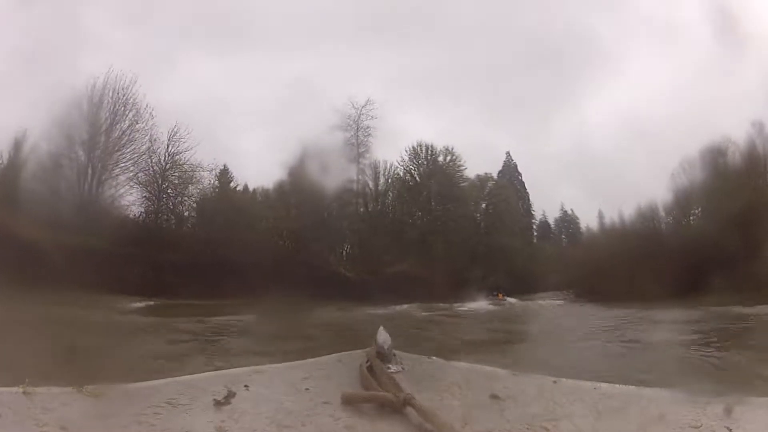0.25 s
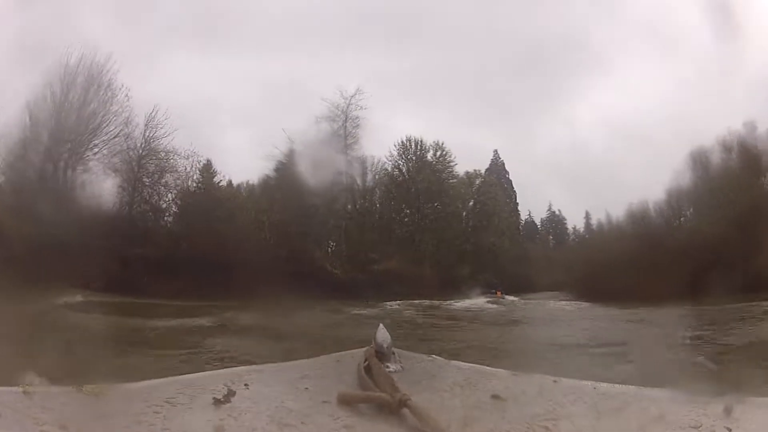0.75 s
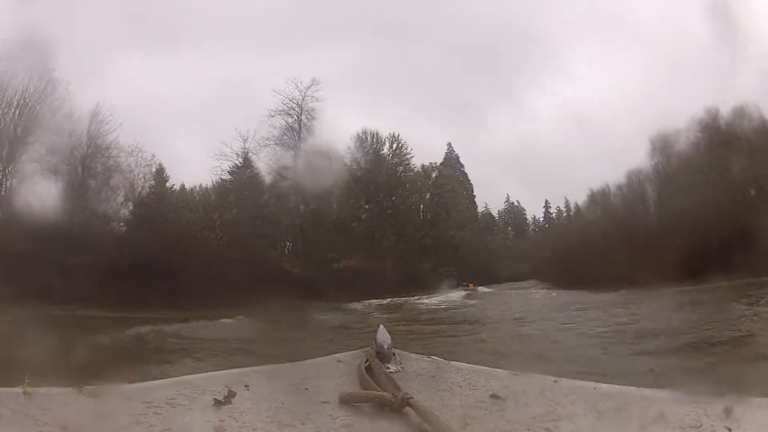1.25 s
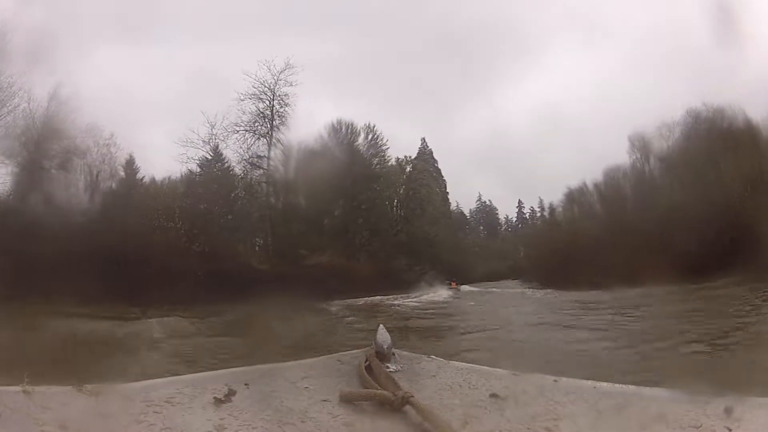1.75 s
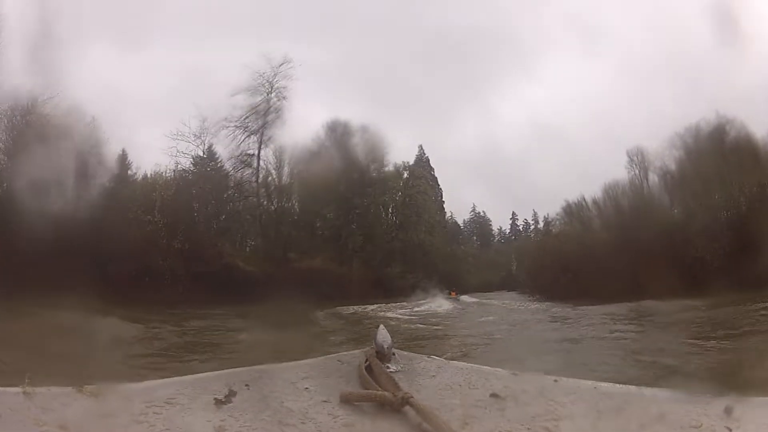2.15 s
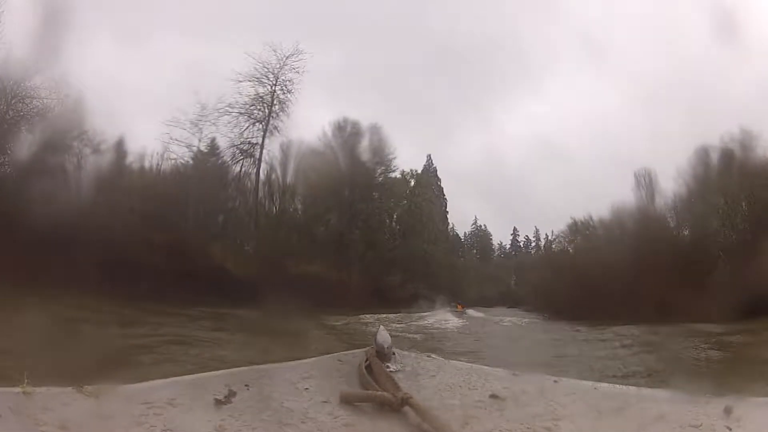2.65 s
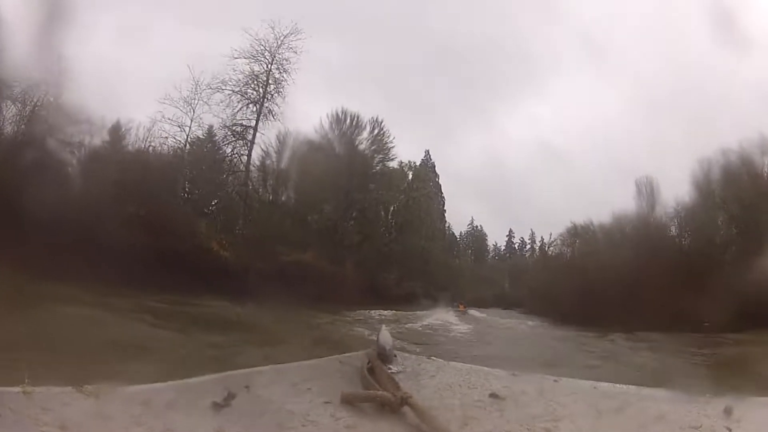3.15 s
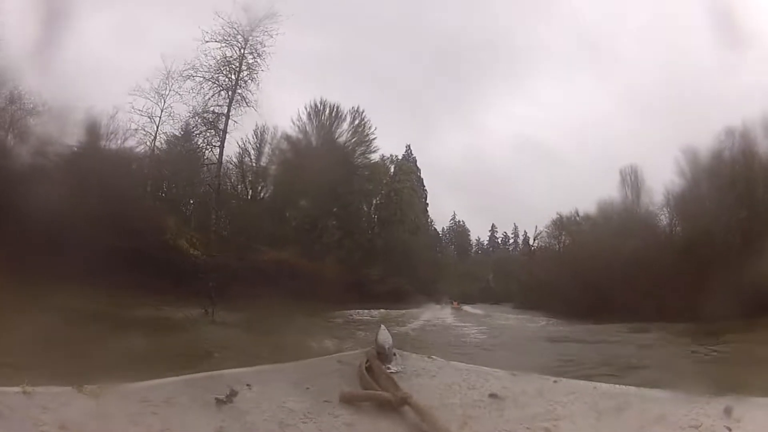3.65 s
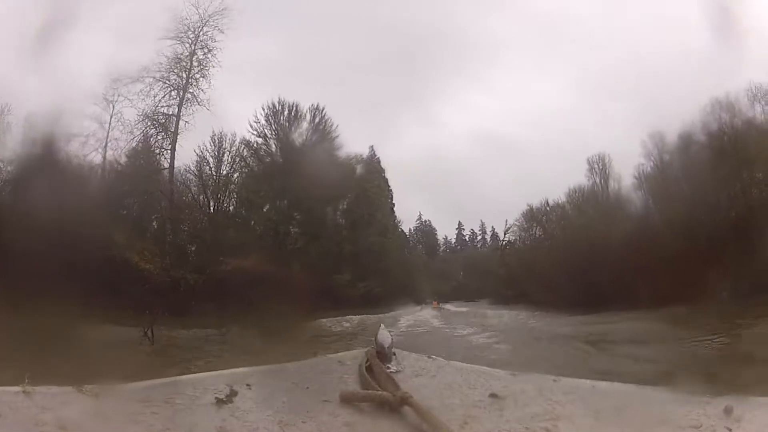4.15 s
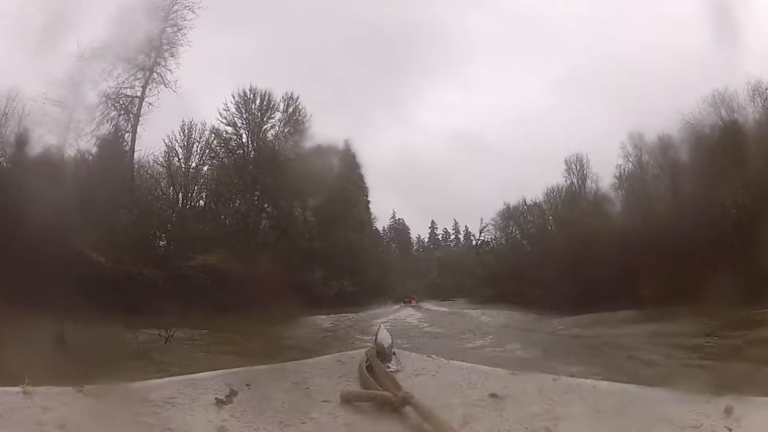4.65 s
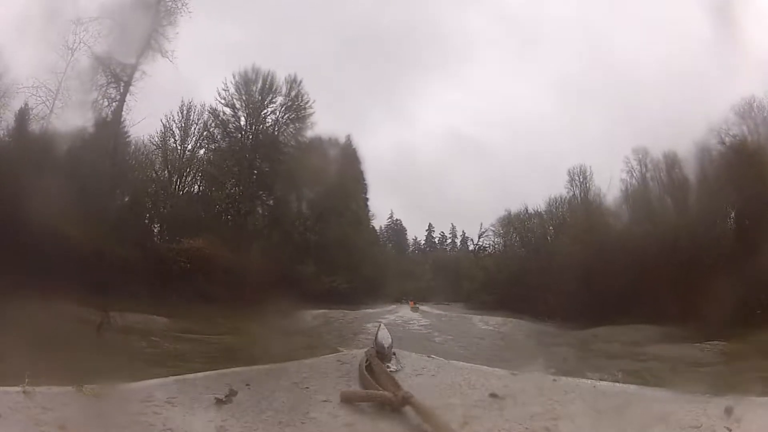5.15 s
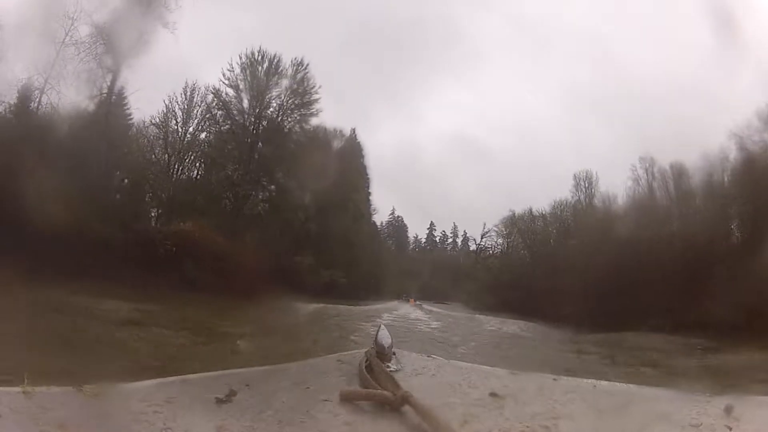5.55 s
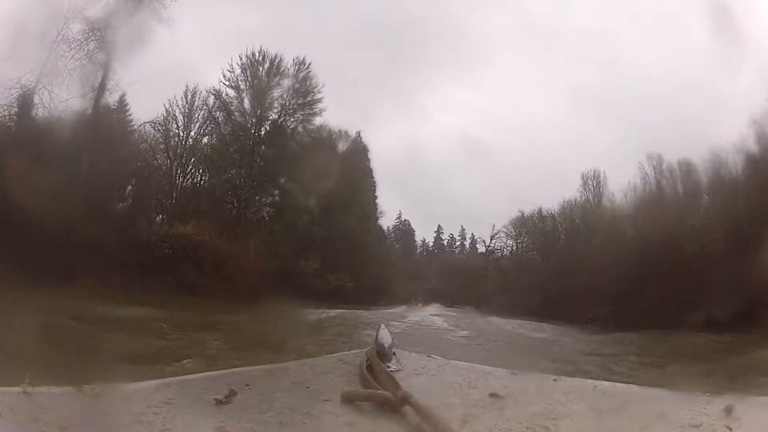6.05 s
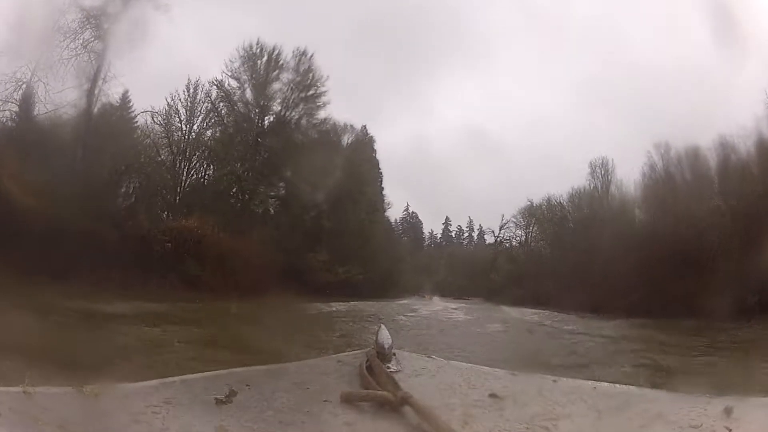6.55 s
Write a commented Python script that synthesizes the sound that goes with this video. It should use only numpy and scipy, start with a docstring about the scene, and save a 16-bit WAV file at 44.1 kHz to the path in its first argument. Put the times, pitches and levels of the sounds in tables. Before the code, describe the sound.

Steady resonant water hiss surrounds a motorboat engine heard close through the hull. The pitch climbs briefly, collapses, then recovers to a long droning cruise full of little clicks. Near the end the throttle is cut and the hull rumbles and booms with quick wave thumps as the engine chugs low and slowly picks up. Outdoors on a river, the microphone is enclosed, so the sound is hollow, coloured and identical on both sides.

```python
"""On a river, inside a closed case on the bow of a small jet boat that is under way.
The engine cruises, races, drops to a chug and picks up again, then drops once more and slowly picks up.
Sine orders make its drone and pulses its buzz; filtered noise and pulses make the hull rumble, boom and sing.
Filtered noise rushes as water and rings the case; short clicks crackle where drone or boom is loud.
Narrow resonances colour all but the drone, and held samples mirror the sound into a glassy treble."""
import sys
import numpy as np
from scipy import signal
from scipy.fft import rfft, irfft
from scipy.io import wavfile
from scipy.ndimage import uniform_filter1d

SR = 44100
rng = np.random.default_rng(int(sys.argv[2]) if len(sys.argv) > 2 else 0)


def unload_audio(sound):
    """Save the sound as a 16-bit wav file, at the path given as the first command line argument."""
    columns = np.transpose(np.atleast_2d(sound))
    # keep every value between -1 and 1, then stretch to whole-number steps
    steps = np.round(np.clip(columns, -1, 1) * 32767)
    wavfile.write(sys.argv[1], SR, steps.astype(np.int16))


N = 299439
TIME, FREQ = np.arange(N) / SR, np.fft.rfftfreq(N, 1 / SR)  # s, Hz


def amp(db):
    """Decibels to gain."""
    return 10 ** (np.asarray(db) / 20)


def unit(x):
    """Scales to rms 1."""
    return x / np.sqrt(np.mean(x ** 2) + 1e-20)


def drift(rate_hz):
    """Slow random movement of rms 1, up to about this rate."""
    spectrum = rfft(rng.standard_normal(N))
    return unit(irfft(spectrum / (1 + (FREQ / rate_hz) ** 4), N))


def churn(patchy_db, rate_hz):
    """Noise that comes in uneven gusts."""
    return rng.standard_normal(N) * amp(patchy_db * drift(rate_hz))


def steadied(x, size):
    """Holds the rms at 1 over spans of this many samples, leaving the quicker throb."""
    return x / np.sqrt(uniform_filter1d(x ** 2, size=size) + 1e-12)


def scatter(x, spread_s=.014):
    """Each pitch takes its own path through the hull, so sharp pulses arrive smeared."""
    knots = np.arange(0, SR / 2, 45)
    delay_s = np.interp(FREQ, knots, spread_s * rng.random(len(knots)))
    phase = 2 * np.pi * np.cumsum(delay_s) * SR / N
    return irfft(rfft(x) * np.exp(-1j * phase), N)


# narrow resonances of the case: (f/Hz, width/Hz, lift/dB)
MODES = [(331.3, 15.4, 7.5), (608.5, 29, 10), (759, 13, 4), (998, 22, 6), (1094, 14.5, 6.5), (1777, 94, 3),
         (1891, 140, 5), (1938, 20, 3), (2039, 40, 9.5)]


def colour(x, points):
    """Filters by a relative spectrum and by the narrow resonances of the case; rms 1."""
    hz, db = np.transpose(points)
    shape_db = np.interp(np.log(FREQ + 1), np.log(hz), db, left=-90, right=-90)
    lift_db = sum(lift / (1 + (2 * (FREQ - f) / width) ** 2) for f, width, lift in MODES)
    return unit(irfft(rfft(x) * amp(shape_db + lift_db), N))


CRUISE_HZ = 64  # firing rate at cruise


def by_revs(law, rate_hz):
    """A level in dB that changes steadily with each octave the engine turns below or above cruise."""
    cruise_db, db_per_octave = law
    return cruise_db + db_per_octave * np.log2(CRUISE_HZ / rate_hz)


# engine speed: (t/s, firing rate f/Hz)
REVS = [(0, 51.46), (.36, 60.94), (.72, 65.26), (.87, 63.23), (1.29, 64.57), (1.46, 70.56), (1.65, 86.6),
        (1.77, 85), (1.83, 54.07), (1.98, 36.3), (2.1, 37.5), (2.3, 56.04), (2.48, 60.49), (2.7, 66.73),
        (3.05, 68.68), (3.6, 65.78), (4.23, 67.2), (4.42, 64.7), (4.66, 61.99), (4.9, 61.91), (5.05, 62.68),
        (5.28, 62.37), (5.36, 47.07), (5.48, 35.22), (5.61, 28.17), (5.88, 27.56), (6.12, 29.59),
        (6.33, 32.91), (6.79, 38.88)]


def revs():
    """The firing rate, and the running count of firings with a slight waver in speed."""
    rate_hz = np.interp(TIME, *np.transpose(REVS))
    turns = np.cumsum(rate_hz * (1 + .002 * drift(12))) / SR
    return rate_hz, turns


# the throttle is let go and the jet falls quiet: (start t/s, recovery t/s, depth level/dB)
THROTTLE_CUTS = [(1.668, 1.987, 6.5), (5.227, 5.508, 3)]
CUT_FALL_S, CUT_RECOVER_S = 0.086, 0.049


def throttle_drop():
    """Decibels lost while the throttle is let go: a fall, a hold and a quick recovery."""
    drop_db = 0
    for start, end, depth_db in THROTTLE_CUTS:
        fall = (TIME - start) / CUT_FALL_S
        recovery = 1 - (TIME - end) / CUT_RECOVER_S
        drop_db = drop_db + depth_db * np.clip(np.minimum(fall, recovery), 0, 1)
    return drop_db


# how well the hull passes an engine order, with resonances near 205 and 240 Hz: (f/Hz, level/dB before order trim)
DRONE = [(28, -20.5), (29, -30), (52, -39), (63, -32), (65, -37), (66.5, -47), (85, -42), (98, -34),
         (118, -48), (130, -46), (135, -31.5), (150, -51), (180, -31), (194, -26), (199, -16), (205, -11.5),
         (214, -15), (223, -28), (240, -9.5), (262, -39.5)]
# trim of orders one to three, the second weakest: (level/dB)
ORDERS_DB = [-1, -7.5, -0.5]
RING_UP_S = 0.052
DRONE_WAVER_DB, DRONE_WAVER_HZ = .9, 12  # rms depth, top rate


def drone_levels(rate_hz, drop_db):
    """Level in dB of the first three orders: the hull takes a moment to ring up on each, and they waver."""
    keep = np.exp(-1 / (RING_UP_S * SR))
    levels = []
    for k, order_db in enumerate(ORDERS_DB, 1):
        db = order_db + np.interp(k * rate_hz, *np.transpose(DRONE))
        rung_up = db[0] + signal.lfilter([1 - keep], [1, -keep], db - db[0])
        # slow to rise, quick to fall
        levels.append(np.minimum(db, rung_up) + DRONE_WAVER_DB * drift(DRONE_WAVER_HZ))
    levels[-1] -= drop_db  # the third order sags with the throttle
    return levels


# strength of each firing in the cycle of three, at contrast 1: (level/dB)
CYLINDERS_DB = [0, -4.5, -2.5]


def firings(turns, uneven, contrast=1):
    """One pulse a firing; the cylinders differ in strength and timing, and each pulse varies at random."""
    count = len(CYLINDERS_DB)
    timed = turns + .007 * np.sin(2 * np.pi * turns / count)
    fired = np.floor(timed).astype(int)
    strength = amp(CYLINDERS_DB)[fired % count] ** contrast
    strength = strength * (1 + uneven * rng.standard_normal(N))
    return np.diff(fired, prepend=0) * strength


# spectrum of the exhaust buzz: (f/Hz, relative level/dB)
EXHAUST = [(230, -39), (270, -7.5), (330, -1), (400, -10), (455, -0.5), (510, 8.5), (620, 0.5), (750, 3),
           (1030, 5), (1400, -14), (1820, 16), (2100, 4.5), (2400, 1), (3000, -46)]
# the buzz hardly follows the revs: (cruise level/dB before trim, rise/dB per octave of lost revs)
BUZZ_LAW = (-34.5, -0.26)
# the exhaust's path shifts as the boat moves: rms swing in radians, top rate
PATH_SWING, PATH_HZ = .7, 4


def engine(turns, rate_hz, orders_db, drop_db):
    """Clean low orders under the firing buzz, whose partials fade in and out as their path shifts."""
    drone = 0
    for k, db in enumerate(orders_db, 1):
        drone = drone + amp(db) * np.sqrt(2) * np.sin(2 * np.pi * k * turns)
    pulses = firings(turns, uneven=.1)
    angle = PATH_SWING * drift(PATH_HZ)
    heard = np.cos(angle) * scatter(pulses) + np.sin(angle) * scatter(pulses)
    buzz_db = by_revs(BUZZ_LAW, rate_hz) - drop_db
    return drone + colour(heard, EXHAUST) * amp(buzz_db + 10.5)


# the slower the engine, the harder it rocks the hull:
# (cruise level/dB before trims, rise/dB per octave of lost revs)
RUMBLE_LAW = (-38.5, 13.7)
BOOM_LAW = (-29, 10.2)
PANEL_LAW = (-37.5, 11.9)
# the boom gives way to a strong drone: (third-order level/dB, change of the boom level/dB)
BOOM_YIELD = [(-34.5, 0.5), (-9, -8.5)]
RUMBLE_CUT_SHARE, BOOM_CUT_SHARE = 0.76, .3  # how much of a throttle cut reaches each


def hull_levels(rate_hz, third_db, drop_db, rumble_change_db, boom_change_db):
    """Levels in dB of rumble, boom and panel, set by the revs, the throttle and the passing changes."""
    rumble_db = by_revs(RUMBLE_LAW, rate_hz) + rumble_change_db - RUMBLE_CUT_SHARE * drop_db
    yield_db = np.interp(third_db, *np.transpose(BOOM_YIELD))
    boom_db = by_revs(BOOM_LAW, rate_hz) + boom_change_db + yield_db - BOOM_CUT_SHARE * drop_db
    panel_db = by_revs(PANEL_LAW, rate_hz) - drop_db
    return rumble_db, boom_db, panel_db


# spectra of the hull's rumble, boom and singing panel: (f/Hz, relative level/dB)
RUMBLE = [(12, -34), (25, -10), (45, -14), (72, -9), (100, -5.5), (125, -7.5), (150, -4.5), (170, -0.5),
          (260, 2), (340, -18.5), (600, -14.5)]
BOOM = [(150, -44), (185, -22), (212, 14.5), (245, 11), (268, -3.5), (288, -45), (310, -86), (330, -13.5),
        (355, -27), (450, -23)]
PANEL = [(640, -24), (690, -4), (708, 2), (735, -5), (800, -24)]
SEVENTH_SHARE = .13  # the seventh order's amplitude in the shaking


def hull(turns, rumble_db, boom_db, panel_db):
    """Engine and water shake the hull, which rumbles, booms in one narrow band and sings in one panel."""
    rocking = firings(turns, uneven=.2, contrast=3.5)
    shake = .45 * unit(churn(patchy_db=1.5, rate_hz=15)) + unit(rocking)
    # at low revs the seventh order sweeps up through the boom
    seventh = SEVENTH_SHARE * np.cos(2 * np.pi * 7 * turns)
    boom = colour(shake + seventh, BOOM)
    blows = thumps(swell_s=.014) * steadied(boom, size=800)
    # around each wave its blow takes over from the steady throb
    calm = 1 / (1 + (thumps(swell_s=.028) / amp(boom_db)) ** 2)
    throb = calm * amp(boom_db) * steadied(boom, size=4000)
    rumble = amp(rumble_db + 2.0) * colour(churn(patchy_db=-1, rate_hz=17), RUMBLE)
    panel = amp(panel_db - 6) * colour(scatter(shake), PANEL)
    return throb + blows + rumble + panel


# waves that thump the hull: (t/s, level/dB before trim)
THUMPS = [(1.935, -12.5), (2.109, -17), (5.402, -9), (5.566, -6.5), (5.725, -7.5), (5.776, -2), (5.864, -9),
          (6.075, -2.5), (6.115, 0), (6.191, -6), (6.228, -8.5), (6.277, -7.5), (6.321, -5), (6.403, -5.5),
          (6.464, -5), (6.543, -6)]


def thumps(swell_s):
    """Strength of the bell-shaped swell that each wave gives to the boom of the hull."""
    swells = [amp(db - 4.5) * np.exp(-.5 * ((TIME - s) / swell_s) ** 2) for s, db in THUMPS]
    return np.max(swells, axis=0)


# passing changes in level of wash, rumble and boom:
# (t/s, half-length/s, wash level/dB, rumble level/dB, boom level/dB)
LEVEL_CHANGES = [(.35, .5, 0.5, 0, 3.5), (2.11, 0.14, 3.5, 3, 0.5), (4.407, 0.038, 3, -7, -0.5),
                 (5.298, 0.077, 4, 7.5, 3.5), (5.62, .05, -3.5, 2.5, -0.5), (5.762, 0.023, 4.5, 2.5, 2),
                 (5.917, 0.013, 6, 8.5, 2.5)]


def level_changes():
    """Bell-shaped passing changes, in dB, of the wash, the rumble and the boom."""
    total_db = 0
    for s, half_s, *changes_db in LEVEL_CHANGES:
        bell = np.exp(-.5 * ((TIME - s) / half_s) ** 2)
        total_db = total_db + np.outer(changes_db, bell)
    return total_db


# spectra of the wash along the hull and the ring of the case: (f/Hz, relative level/dB)
WASH = [(200, -18), (400, -25.5), (500, -10), (630, -14.5), (720, 0.5), (830, -1.5), (1000, 4), (1100, 3),
        (1270, -1.5), (1410, -11), (1800, -13)]
CASE = [(1200, -15.5), (1430, -20.5), (1620, -5.5), (1780, 3.5), (1930, -1), (2150, -7), (2440, -6),
        (2780, -22), (3180, -27.5), (3600, -15.5), (3790, -16.5), (4050, -34.5), (5200, -32.5), (6000, -43)]
# both follow the revs only a little: (cruise level/dB before trim, rise/dB per octave of lost revs)
WASH_LAW = (-22.5, 1.35)
CASE_LAW = (-17.5, -1.05)


def rush(turns, rate_hz, wash_change_db, drop_db):
    """Water hisses along the hull and rings the case; the ring pulses a little with the engine."""
    lapping_db = 0.86 * drift(5.3)  # the water never runs quite evenly
    wash_db = by_revs(WASH_LAW, rate_hz) + wash_change_db + lapping_db - drop_db
    case_db = by_revs(CASE_LAW, rate_hz) + lapping_db - drop_db
    wash = colour(churn(patchy_db=0.6, rate_hz=7), WASH)
    pulse = 1 + 0.12 * np.cos(2 * np.pi * 3 * turns)
    ring = colour(churn(patchy_db=1.5, rate_hz=53) * pulse, CASE)
    return amp(wash_db - 1.66) * wash + amp(case_db - 1.21) * ring


# the loudest sharp clicks: (t/s, level/dB before colour and trim)
SHARP_CLICKS = [(.396, -28), (0.4434, -22.5), (0.783, -22), (.8972, -23), (0.9907, -27), (1.1163, -29),
                (1.3316, -23), (2.742, -21.5), (2.995, -24), (3.023, -20), (3.112, -19), (3.142, -19.5),
                (3.216, -19.5), (3.454, -17), (3.467, -18), (3.667, -16), (3.7393, -19), (4.2372, -18),
                (4.2975, -18), (4.5477, -20.5), (5.7596, -20)]
# spectrum of the clicks: (f/Hz, relative level/dB)
CLICK = [(1500, -29), (2800, 17), (4000, 16), (5200, 13), (5650, 6.5), (6000, -94)]
# the crackle grows with drone or boom up to this level; click level before trim, dB per dB, random spread
CRACKLE_FULL_DB, CRACKLE_DB, CRACKLE_STEEPNESS, CRACKLE_UNEVEN_DB = -10, -20, 2.3, 4
STRAY_PER_S, STRAY_SHARE = 130, 0.61  # random clicks: mean rate, strength beside a click on a firing


def clicking(turns, loud_db):
    """Single sharp clicks, and a crackle that grows steeply with the level of drone or boom."""
    on_firings = np.diff(np.floor(turns), prepend=0)
    stray = STRAY_SHARE * (rng.random(N) < STRAY_PER_S / SR)
    uneven_db = CRACKLE_UNEVEN_DB * np.clip(rng.standard_normal(N), -2, 2)
    growth_db = CRACKLE_STEEPNESS * np.minimum(loud_db - CRACKLE_FULL_DB, 0)
    clicks = (on_firings + stray) * amp(CRACKLE_DB + growth_db + uneven_db)
    for s, db in SHARP_CLICKS:
        clicks[round(s * SR)] += amp(db)
    # each click trails fine noise with a two-millisecond decay
    tail = signal.lfilter([1], [1, -np.exp(-1 / (.002 * SR))], clicks)
    trail = .07 * tail * rng.standard_normal(N)
    return amp(15.5) * np.std(clicks) * colour(clicks + trail, CLICK)


# brief dips of boat and water: (t/s, length/s, depth level/dB)
DIPS = [(2.372, .03, 3.5), (4.89, .043, 4), (5.42, .045, 2), (6.568, .08, 4)]


def dips():
    """Gain that dips briefly, with edges softened over a few milliseconds."""
    drop_db = sum(depth_db * ((TIME > s) & (TIME < s + length)) for s, length, depth_db in DIPS)
    return amp(-uniform_filter1d(drop_db * 1., size=200))


def scene():
    """The revs steer the layers; engine, hull, water and clicks are summed to one signal on both channels."""
    rate_hz, turns = revs()
    drop_db = throttle_drop()
    orders_db = drone_levels(rate_hz, drop_db)
    third_db = orders_db[-1]
    wash_change_db, rumble_change_db, boom_change_db = level_changes()
    rumble_db, boom_db, panel_db = hull_levels(rate_hz, third_db, drop_db, rumble_change_db, boom_change_db)
    boat = engine(turns, rate_hz, orders_db, drop_db) + hull(turns, rumble_db, boom_db, panel_db)
    water = rush(turns, rate_hz, wash_change_db, drop_db)
    # the third order of the drone or the boom, whichever is louder
    loud_db = np.maximum(third_db, boom_db + .5)
    mono = (boat + water) * dips() + clicking(turns, loud_db)
    return np.array([mono, mono])


HOLD_HZ, EDGE_HZ = 12000, 15330  # sample-hold rate, top of the band


def record(dry):
    """Holding samples at a low rate mirrors the sound into a glassy treble; then the band limit."""
    narrow = irfft(rfft(np.clip(dry, -1, 1)) * (FREQ < HOLD_HZ / 2), N)
    mirrored = narrow * (1 + 2 * np.cos(2 * np.pi * HOLD_HZ * TIME))
    held = irfft(rfft(mirrored) * np.sinc(FREQ / HOLD_HZ), N)
    band_limit = signal.firwin(511, EDGE_HZ, window=("kaiser", 9), fs=SR)
    return signal.oaconvolve(held, band_limit[None], "same")


dry = scene()
out = record(dry)
unload_audio(out)
```